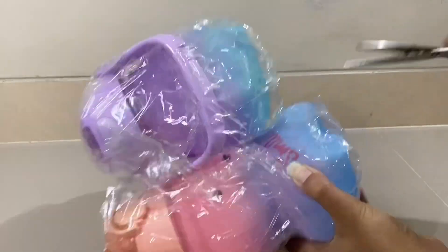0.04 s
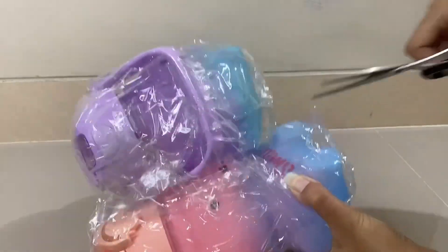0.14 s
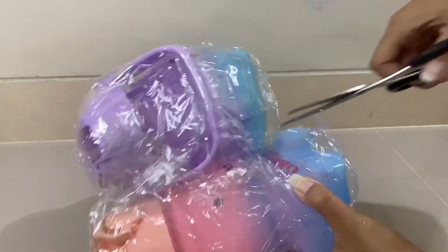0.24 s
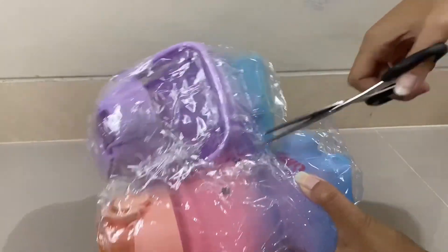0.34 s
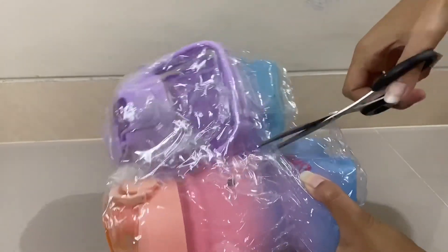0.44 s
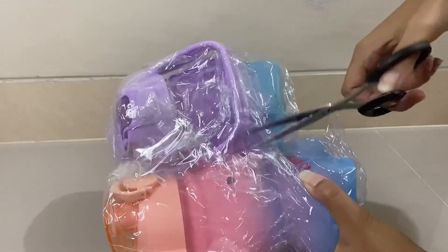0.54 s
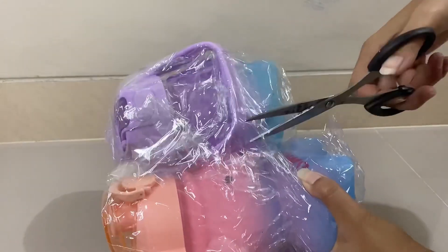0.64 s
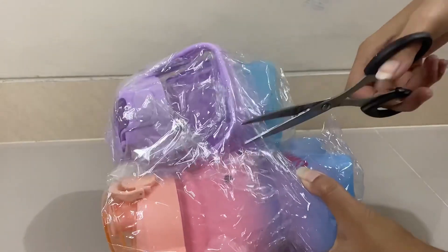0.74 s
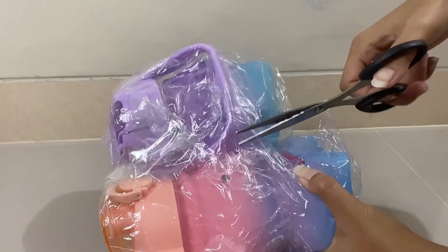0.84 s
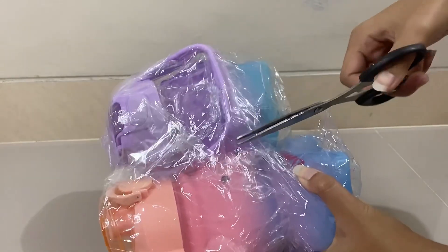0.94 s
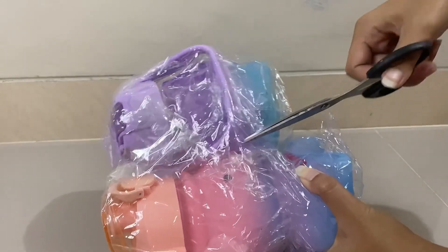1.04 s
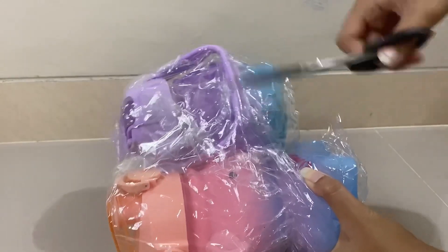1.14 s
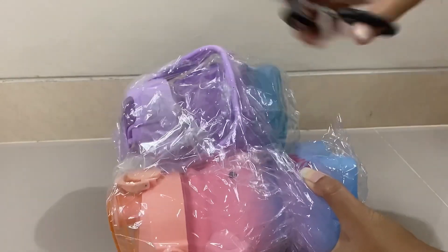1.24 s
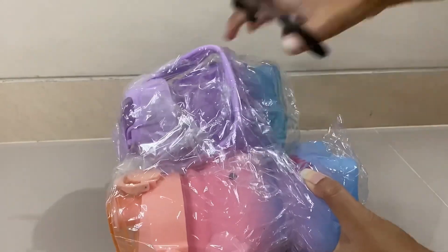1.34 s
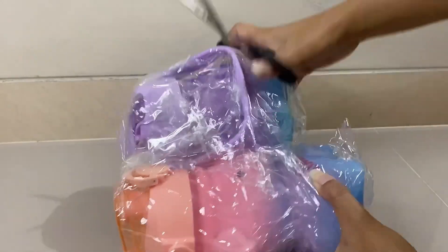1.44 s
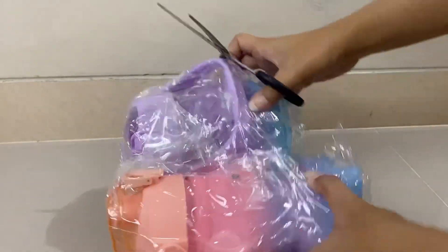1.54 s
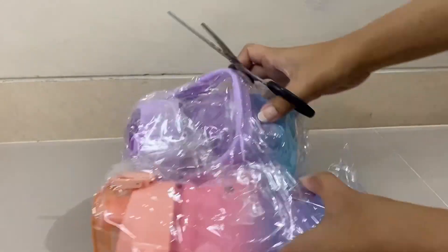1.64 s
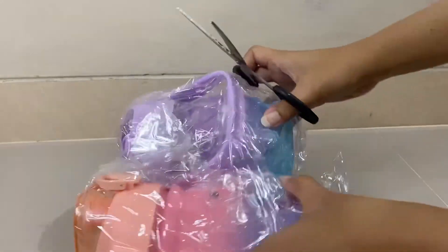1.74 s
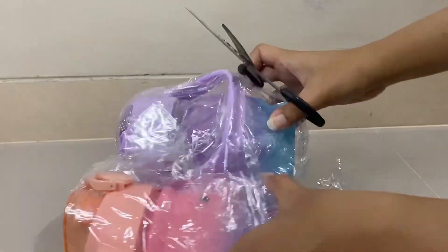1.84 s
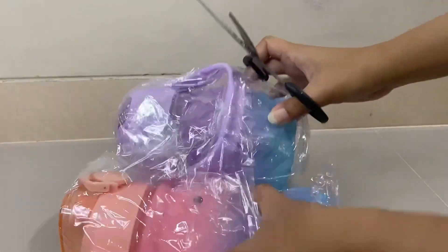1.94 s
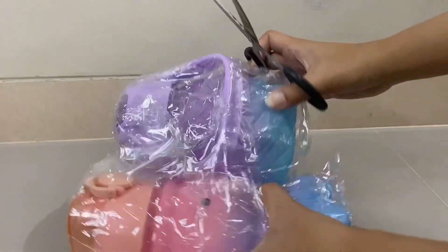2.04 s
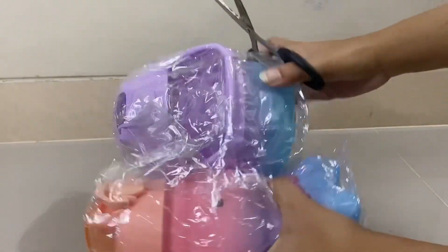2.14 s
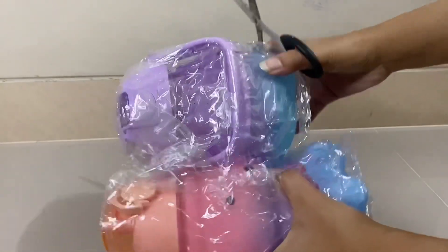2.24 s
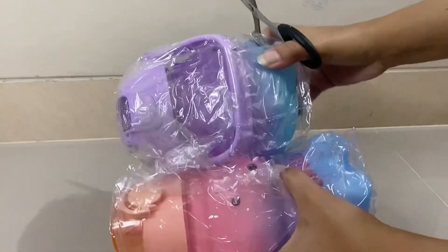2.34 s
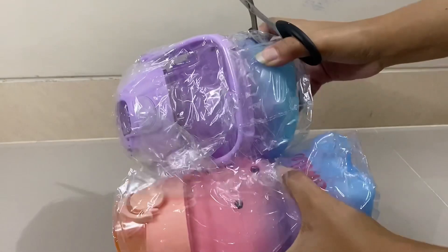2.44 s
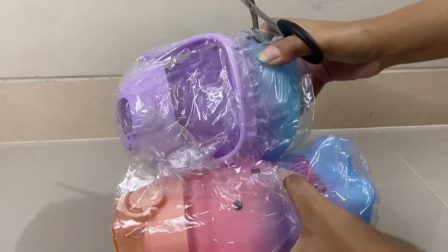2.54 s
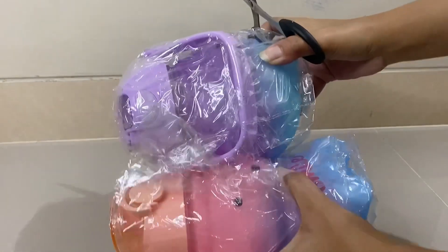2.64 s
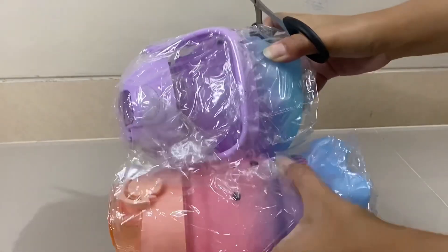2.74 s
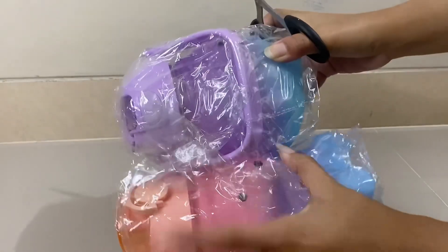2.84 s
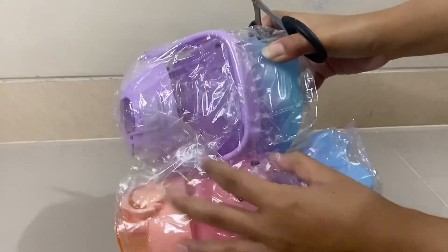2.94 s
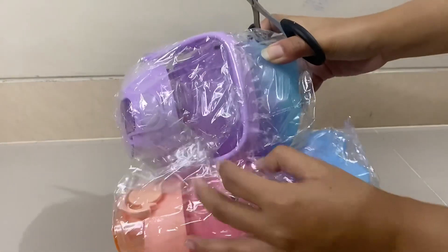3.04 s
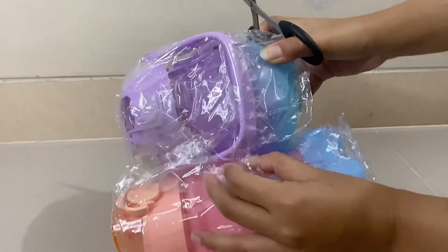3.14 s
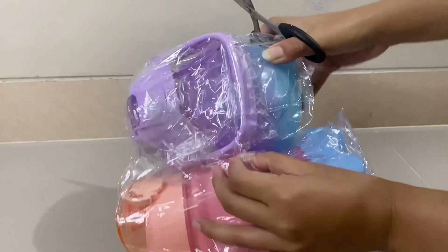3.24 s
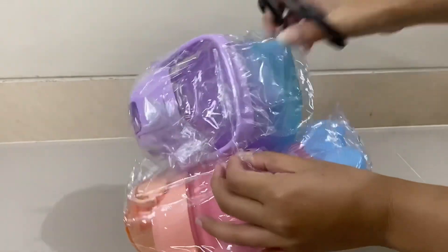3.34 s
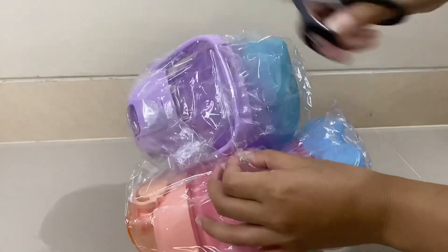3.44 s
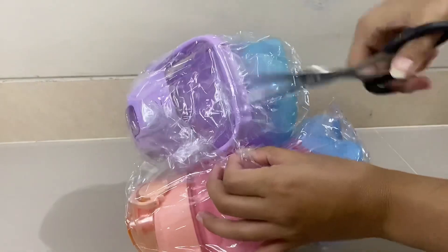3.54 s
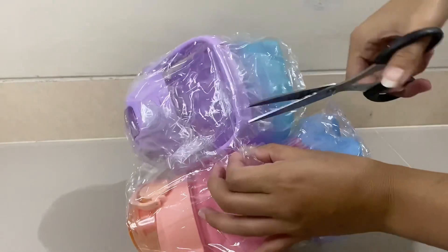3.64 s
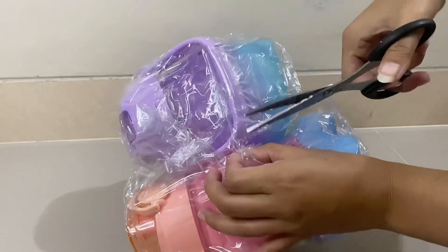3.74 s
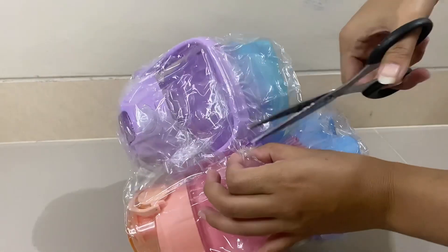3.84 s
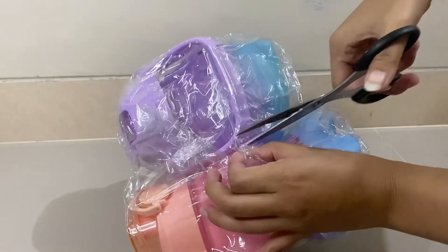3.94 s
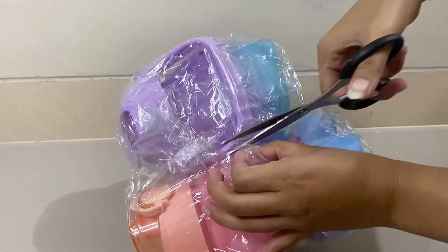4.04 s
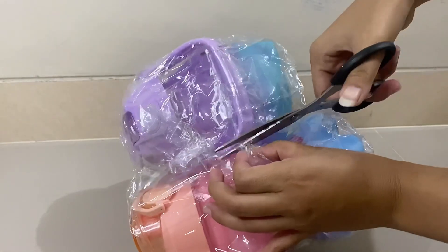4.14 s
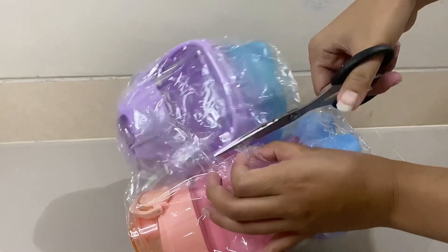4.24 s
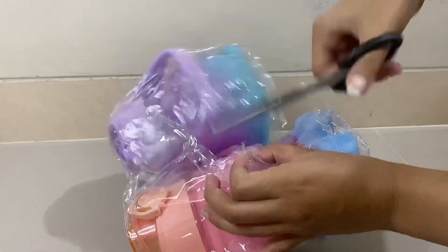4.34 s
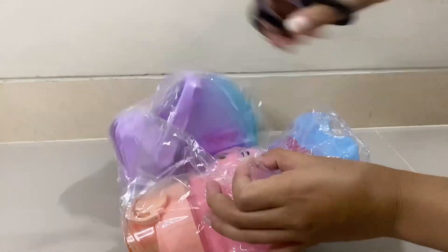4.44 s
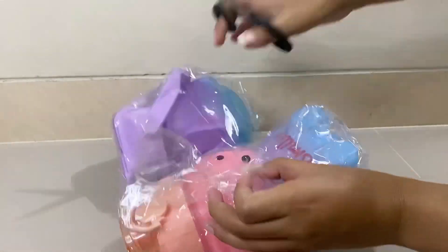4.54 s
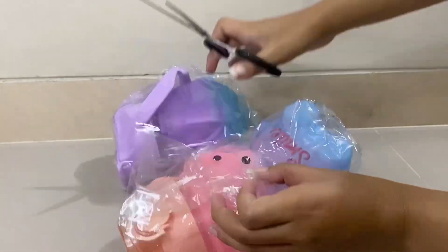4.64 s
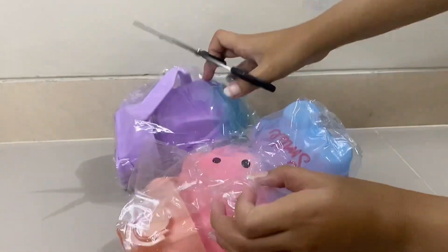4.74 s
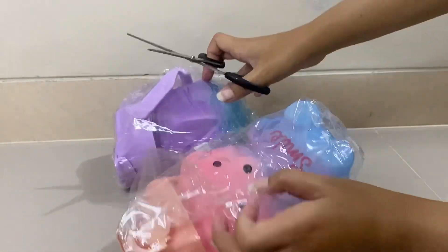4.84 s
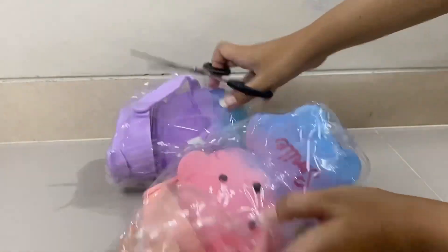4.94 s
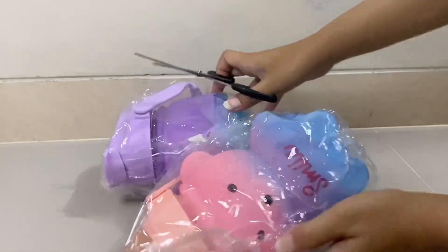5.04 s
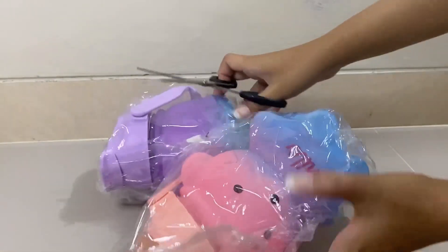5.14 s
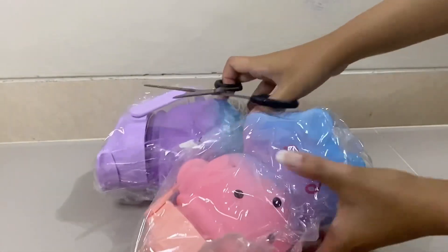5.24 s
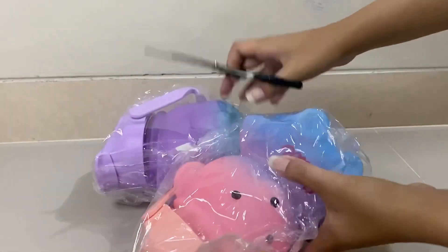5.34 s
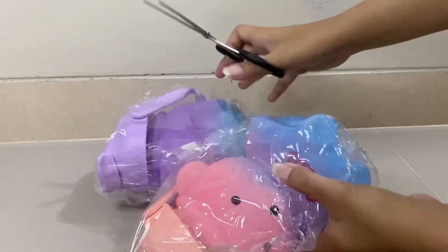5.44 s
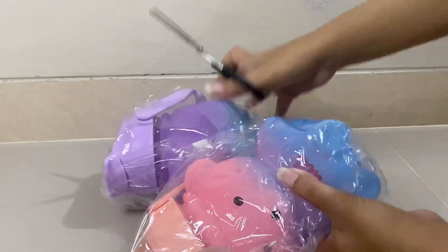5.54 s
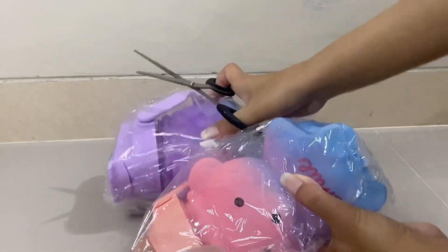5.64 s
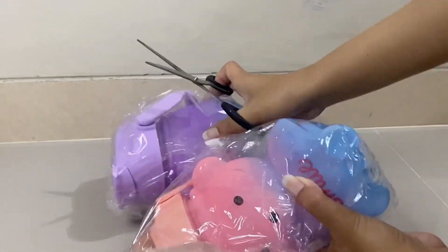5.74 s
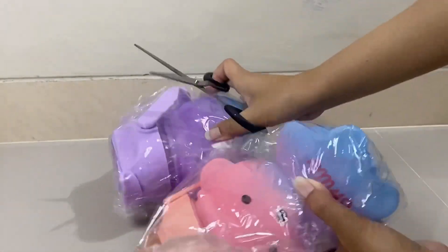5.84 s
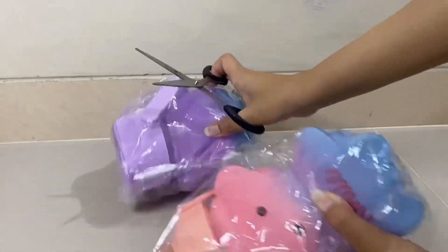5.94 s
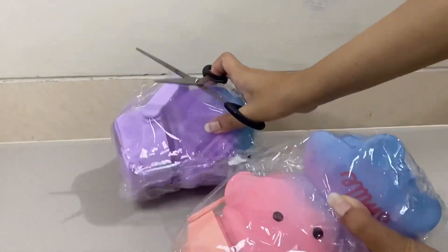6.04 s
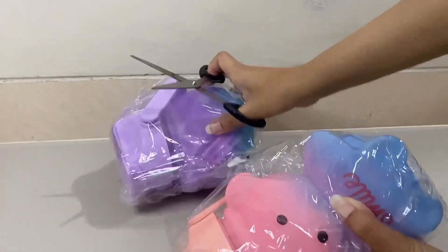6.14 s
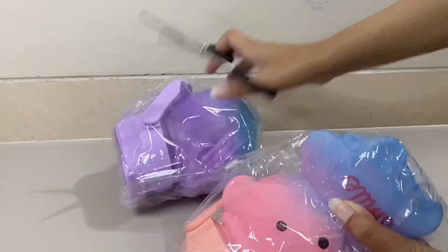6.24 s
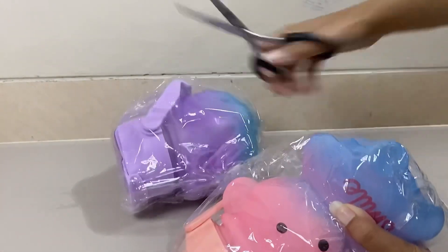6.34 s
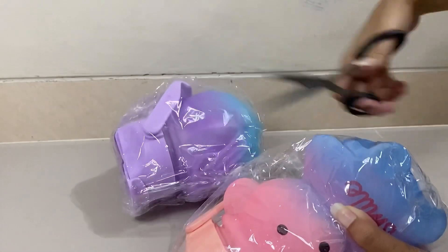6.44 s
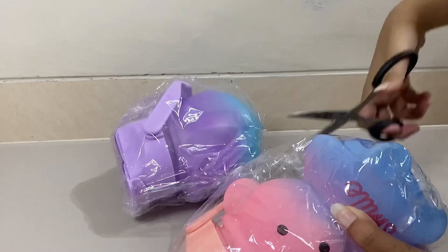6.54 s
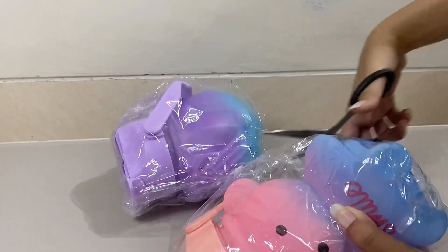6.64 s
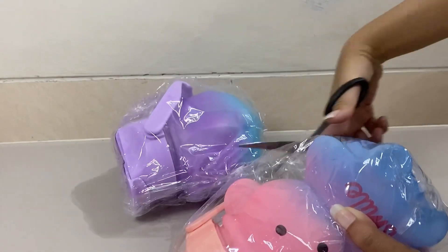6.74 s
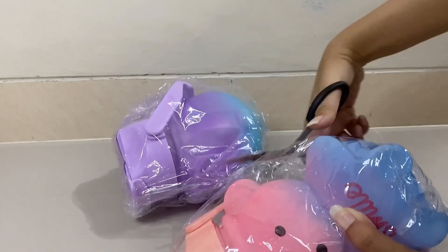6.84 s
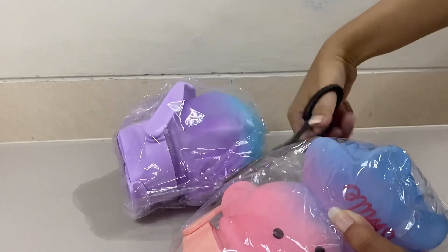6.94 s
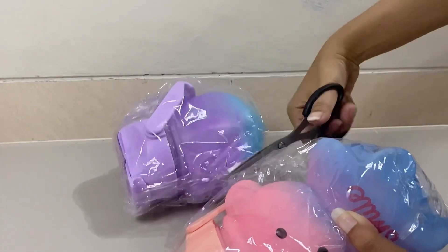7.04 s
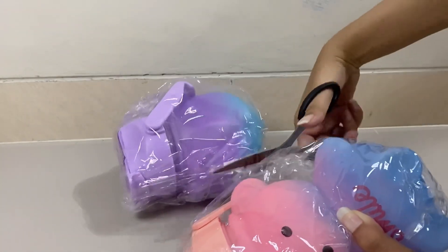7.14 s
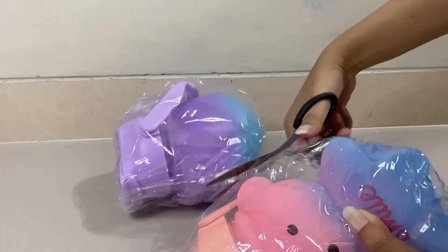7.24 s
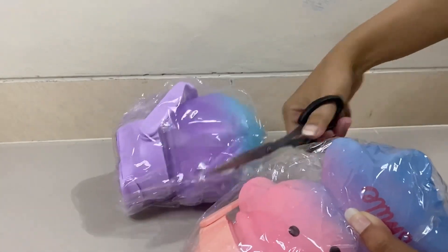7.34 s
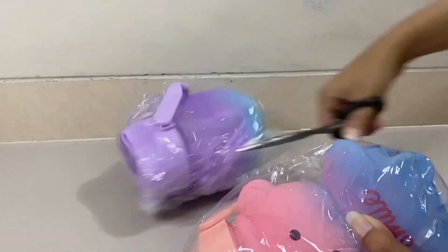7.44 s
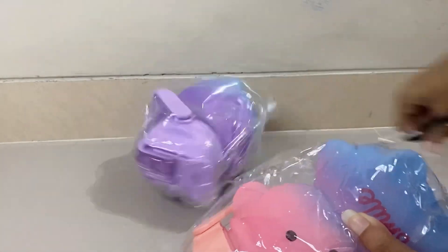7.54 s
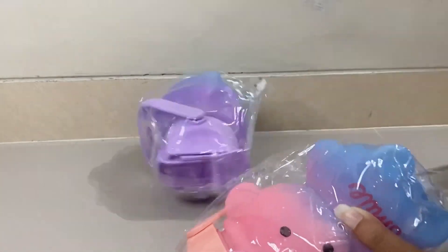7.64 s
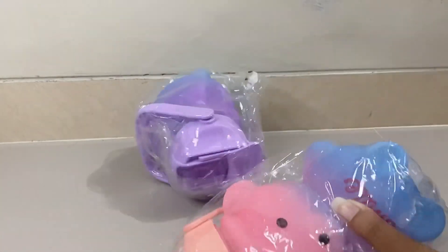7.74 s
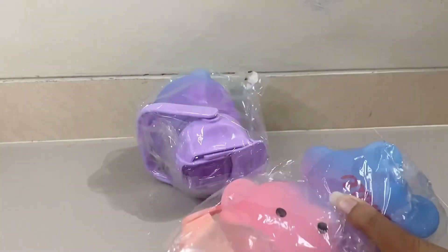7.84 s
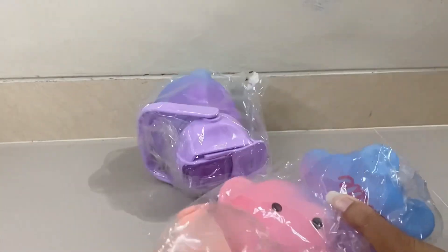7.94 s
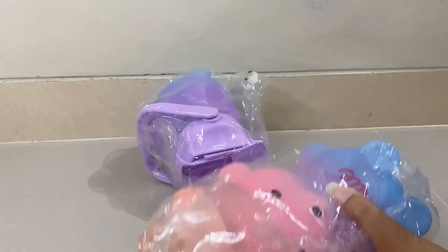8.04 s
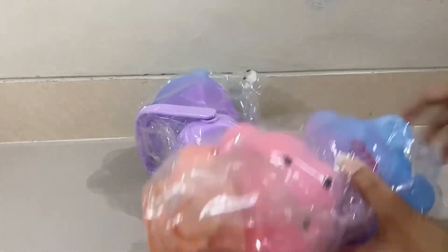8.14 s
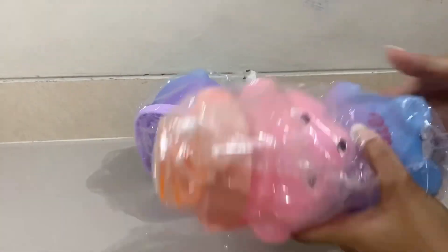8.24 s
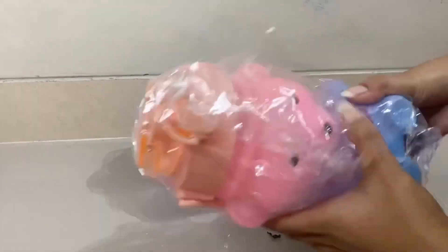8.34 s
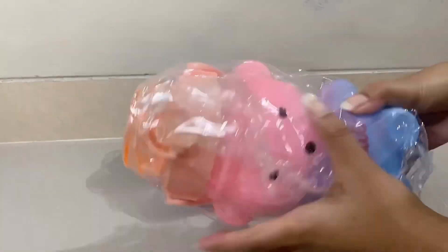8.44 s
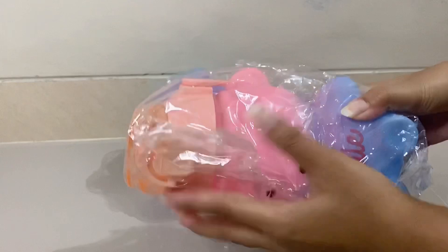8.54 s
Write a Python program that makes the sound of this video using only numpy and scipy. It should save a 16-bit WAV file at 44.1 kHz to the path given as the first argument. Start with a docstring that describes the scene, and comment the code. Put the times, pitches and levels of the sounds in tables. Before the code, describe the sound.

Close stereo pickup of hands working tight clear film around hollow plastic bottles in a small hard room. Bright crinkles and sharp snaps come in surges, denser after the first second. A loud hollow knock lands midway, another clattering bump follows later, then lighter crackling thins almost to quiet before a last burst. A faint low hum lies beneath.

```python
"""Hands and scissors work a tight plastic film off hollow plastic bottles on a counter in a small hard room.
A low building hum, noise in narrow resonances over faint air, lies below throughout and slowly weakens.
From the start the film's creases buckle: surges of noise bursts, clicks and brief rings, with louder snaps.
From about 1 s bottles knock, rattling noise into ringing modes, hardest near 4.4 s and again near 5.9 s;
then the handling is mostly lighter, with new surges to the end. Two microphone ports hear it at different moments."""
import sys
import numpy as np
from scipy import signal
from scipy.fft import rfft, irfft, next_fast_len
from scipy.io import wavfile

SR = 44100
rng = np.random.default_rng(int(sys.argv[2]) if len(sys.argv) > 2 else 0)


def persist_wave(psi):
    """Save psi, clipped to +-1, as 16-bit WAV."""
    counts = np.round(np.clip(psi, -1, 1) * 32767).astype(np.int16)
    wavfile.write(sys.argv[1], SR, np.atleast_2d(counts).T)


N = 378378

# stereo tilt of film and bottles: f/Hz, left minus right level/dB
STEREO_TILT = [(60, 0.3), (130, -1), (250, -6.5), (550, -0.5), (1000, 1), (1650, 2), (4970, 2), (15000, -1)]
LEFT_RIGHT = np.array([[0.5], [-0.5]])  # half of a tilt goes to each side
MEAN_HANDLING_DB = -45  # crackle level at which density and sheen are neutral


def from_db(db):
    """Decibels to gain; twice the decibels give a power gain."""
    return 10 ** (np.asarray(db) / 20)


def rms_one(x):
    """Scale to rms 1."""
    return x / np.sqrt(np.mean(x ** 2) + 1e-20)


def at_hz(points, hz):
    """Read a (f/Hz, value) table on a log-frequency axis."""
    table_hz, values = np.transpose(points)
    return np.interp(np.log(hz), np.log(table_hz), values)


def fade(power, t60):
    """Each power impulse dies away by 60 dB in t60 seconds; the summed energy is kept."""
    r = 10 ** (-6 / (t60 * SR))
    return signal.lfilter([1 - r], [1, -r], power + 1e-18)


def drift(rate_hz):
    """Slow chance of spread 1: noise through two equal low-pass poles, drawn every 40 samples."""
    r = np.exp(-80 * np.pi * rate_hz / SR)
    slow = signal.lfilter([1], [1, -2 * r, r * r], rng.standard_normal(N // 40 + 2002))
    slow = slow[2000:]  # past the filter's start
    return np.interp(np.arange(N) / 40, np.arange(len(slow)), rms_one(slow - slow.mean()))


def pair(white, alike):
    """Left and right noise of a given likeness from two unrelated noises."""
    alike = np.clip(alike, 0, 1)
    middle = np.sqrt(1 + alike) * white[0]
    side = np.sqrt(1 - alike) * white[1] * [[1], [-1]]
    return (middle + side) / np.sqrt(2)


def ring(drive, hz, t60):
    """A two-pole resonator: a unit click sets a sine of height 1 ringing, down 60 dB after t60 seconds."""
    r, w = from_db(-60 / (t60 * SR)), 2 * np.pi * hz / SR
    return signal.lfilter([0, np.sin(w)], [1, -2 * r * np.cos(w), r * r], drive + 1e-18)


def room_tone():
    """Building hum as noise in narrow low resonances, over a broad faint air; both weaken together."""
    # low resonances of the hum: f/Hz, width/Hz, relative level/dB
    resonances = [(47, 3.7, 3.5), (74.2, 3.1, 3.5), (100.6, 7.2, 0.5), (127.3, 5.9, -2), (160.1, 6.4, -7.5),
                  (200, 6.9, -12.5), (295.1, 6.2, -6.5)]
    # spectrum of the air: f/Hz, relative level/dB per Hz
    air_colour = [(30, -18), (45, 1), (110, -3), (250, -10), (450, -26.5), (1000, -33.5), (3000, -61),
                  (7000, -72), (15000, -57)]
    # slow weakening: t/s, level/dB
    weakening = [(0, 2), (2.2, 1.5), (3.5, 1), (6, -1.5), (8.58, -1.5)]
    size = next_fast_len(N)
    hz = np.maximum(np.fft.rfftfreq(size, 1 / SR), 1)
    hum_power = 0
    for centre_hz, width_hz, level_db in resonances:
        hum_power = hum_power + from_db(2 * level_db) / (1 + (2 * (hz - centre_hz) / width_hz) ** 2) ** 2
    white = rng.standard_normal((2, 2, size))
    hum = irfft(rfft(pair(white[0], 0.99)) * np.sqrt(hum_power), size)[:, :N]
    air = irfft(rfft(pair(white[1], 0.91)) * from_db(at_hz(air_colour, hz)), size)[:, :N]
    swell_db = np.interp(np.arange(N) / SR, *np.transpose(weakening))
    return from_db(swell_db - 49.5) * rms_one(hum) + from_db(swell_db - 52.5) * rms_one(air)


def handling():
    """Crackle level and body share in dB through time: the surges of the moving hands add up in power."""
    # grips, tugs and shifts of the film: peak t/s, peak level/dB, rise/s, fall/s, body share of lows/dB
    moves = [(.068, -52, 0.2, 0.065, 9), (0.153, -45.5, 0.035, 0.1, 7.5), (.33, -43, 0.057, 0.23, 0.5),
             (.48, -46, 0.18, 0.26, -2), (.59, -41, 0.073, 0.065, 0.5), (.67, -49, 0.038, 0.1, 0),
             (.82, -56.5, 0.18, 0.09, -4), (0.971, -41, 0.098, 0.13, 0), (1.066, -52, 0.024, 0.048, 6),
             (1.18, -55, 0.056, 0.05, 12), (1.237, -56, 0.026, 0.026, 0), (1.328, -59, .015, 0.038, -4),
             (1.362, -47, 0.052, 0.06, 1), (1.39, -42, 0.044, 0.28, -7), (1.47, -40, 0.1, 0.21, 3),
             (1.549, -36, 0.13, 0.24, 2.5), (1.89, -37.5, 0.33, 0.56, -3.5), (2.12, -35, 0.45, 0.25, -1.5),
             (2.33, -42, 0.2015, 0.42, -8.5), (2.53, -40, 0.51, 0.29, 0.5), (2.67, -36, 0.07, 0.35, -1.5),
             (2.97, -34, 0.064, 0.32, -3.5), (3.18, -36.5, 0.28, 0.45, -2.5), (3.58, -43, 0.074, 0.14, -2),
             (3.7, -49, 0.095, 0.23, 1.5), (3.88, -48.5, 0.08, 0.17, 7), (4.03, -44, 0.19, 0.15, 0.5),
             (4.15, -38, 0.18, 0.027, -1.5), (4.214, -40, .02, 0.24, 3), (4.3, -37.5, 0.19, 0.17, 2.5),
             (4.387, -38, .012, 0.042, 0), (4.41, -35, 0.0328, 0.26, 15.5), (4.49, -36.5, 0.198, 0.29, 3),
             (4.68, -47, 0.18, 0.26, -2), (4.84, -39, 0.085, .4, -0.5), (4.98, -34.5, 0.29, 0.11, 1),
             (5.08, -38.5, 0.17, 0.15, -3), (5.284, -35, 0.048, 0.11, -5), (5.38, -47, .2, 0.36, -1),
             (5.59, -37, .15, 0.55, 1), (5.79, -39, 0.39, 0.32, -7.5), (5.89, -30, 0.0697, 0.19, 6),
             (5.961, -30.5, 0.1894, 0.0972, -1.5), (6.15, -40.5, 0.16, 0.34, -2.5),
             (6.409, -48, 0.42, 0.19, -2), (6.52, -61, 0.052, 0.096, 4), (6.629, -62, 0.029, 0.061, -2.5),
             (6.73, -61, 0.038, 0.063, 14), (6.775, -48.5, .015, 0.088, 5), (6.8, -49.5, 0.056, 0.14, 1),
             (6.89, -44, 0.1005, 0.16, 3.5), (6.971, -38, 0.15, 0.11, 1.5), (7.1, -51.5, 0.083, 0.25, -0.5),
             (7.29, -45.5, 0.14, 0.14, 0), (7.36, -45, 0.13, 0.064, 4), (7.48, -38, 0.13, 0.056, 0),
             (7.56, -52.5, 0.1, 0.3, 3), (7.691, -67, 0.069, 0.06, 2.5), (7.79, -55.5, 0.043, 0.19, 9.5),
             (7.921, -52.5, 0.043, 0.32, 8.5), (8.08, -86, 0.096, 0.31, 2.5),
             (8.31, -35, 0.093, 0.25, -2.5), (8.56, -39.5, 0.26, 0.27, -1)]
    surge_span_db = 20  # what a surge climbs in its rise and loses in its fall
    t = np.arange(0, N + 64, 64) / SR
    power, body = from_db(2 * -70), 0  # the film settling between moves
    for s, peak_db, rise_s, fall_s, body_db in moves:
        away = np.maximum((s - t) / rise_s, (t - s) / fall_s)
        surge = from_db(2 * (peak_db - surge_span_db * away))
        power = power + surge
        body = body + surge * body_db
    return [np.interp(np.arange(N) / SR, t, curve) for curve in (10 * np.log10(power), body / power)]


def creases(handling_db):
    """Moments and energies of small random creases; harder handling buckles more a second, in clumps."""
    per_s = 330.0 * from_db(0.4 * (handling_db - MEAN_HANDLING_DB) + 4.0 * drift(25))
    at = np.flatnonzero(rng.random(N) < per_s / SR)
    size_db = 4.2 * np.minimum(rng.exponential(1, len(at)), 3.3)
    energy = from_db(2 * size_db)
    # divided by the rate, so that density alone does not change the level
    return at, energy / np.mean(energy) * SR / per_s[at]


def tinted(hz, level_db, body_db, treble_db):
    """Crackle level at one pitch: the body share rules the lows; harder handling brings more sheen."""
    low = np.interp(np.log(hz), np.log([1000, 2000]), [1, 0])
    high = np.interp(np.log(hz), np.log([5500, 11000]), [0, 1])
    sheen_db = 0.2261 * (level_db - MEAN_HANDLING_DB)
    return level_db + low * (3 + body_db) + high * (treble_db + sheen_db)


def buckling(at, energy, crease_db, snap_at, snap_db):
    """Half-octave bands of clicks, noise bursts and room tail; each crease or snap has its own colour."""
    # spectrum of the crackle: f/Hz, relative level/dB per Hz
    film_colour = [(150, -10.5), (350, -4), (550, -7), (900, -4.5), (1400, -2.5), (2000, 0.5), (2900, 1),
                   (4000, -2.5), (7000, -3), (10000, -6.5), (14500, -3)]
    # stereo likeness of the direct bursts: f/Hz, likeness (0 to 1)
    likeness = [(150, 0.41), (600, 0.11), (1700, 0.4), (4000, 0.099), (6500, 0.35), (9000, 1), (15000, 1)]
    # bands of the snap levels: f/Hz
    snap_bands = [170, 420, 900, 2000, 5000, 11000]
    snap_onset_s, snap_fall_s, rustle_t60_s = 0.0062, 0.0028, 0.019  # 60 dB times; the fall is longer in the lows
    room_t60_s = 0.17
    edges = np.append(130 * 2 ** np.arange(0, 6.9, 0.5), 16500)
    crease_colour = rng.standard_normal((len(at), len(edges)))
    snap_colour = rng.standard_normal((len(snap_at), len(edges)))
    white = rng.standard_normal((4, 2, N))  # neighbouring bands and the tail get unrelated noise
    sign = rng.choice([-1, 1], N)
    out = 0
    for k, (low, high) in enumerate(zip(edges, edges[1:])):
        hz = np.sqrt(low * high)
        level_db = crease_db(hz) + at_hz(film_colour, hz) + 2.97 * crease_colour[:, k] + 6.5
        crease = np.zeros(N)
        crease[at] = energy * from_db(2 * level_db)
        level_db = np.array([np.interp(np.log(hz), np.log(snap_bands), row) for row in snap_db])
        snap = np.zeros(N)
        snap[snap_at] = 0.0016 * SR * from_db(2 * (level_db + snap_colour[:, k]))

        # the sharp instant of buckling
        click = sign * (from_db(-1.5) * np.sqrt(crease) + from_db(-2) * np.sqrt(snap))

        # a snap is a short noise burst with a soft onset, then a weaker, quickly fading rustle
        snap = fade(snap[::-1], snap_onset_s)[::-1]
        snap_burst = from_db(2 * -3) * fade(snap, snap_fall_s + 4.1 / hz)
        snap_rustle = from_db(2 * -7.5) * fade(snap, rustle_t60_s)

        # a small crease is a softer-edged burst of a few milliseconds, longer in the lows
        swell_s = 0.0045 + 3.3 / hz
        crease = fade(fade(crease[::-1], 5.0 * swell_s)[::-1], swell_s)
        burst_power = from_db(2 * -1.75) * fade(crease, swell_s) + snap_burst + snap_rustle
        burst = np.sqrt(burst_power) * pair(white[k % 2], at_hz(likeness, hz))

        tail_power = fade(from_db(2 * -3.25) * crease + from_db(2 * -7) * snap, room_t60_s)
        tail = np.sqrt(tail_power) * pair(white[2 + k % 2], 0.77)

        band = signal.butter(2, [low, high], "band", fs=SR, output="sos")
        side = from_db(at_hz(STEREO_TILT, hz) * LEFT_RIGHT)
        out = out + side * signal.sosfilt(band, click + burst + tail)
    return out


def bottle_ringing(at, energy, crease_db):
    """The bottles ring under the crackling film: each small crease sets one of their resonances sounding at
    random."""
    # resonances of the bottles under the film: f/Hz, relative level/dB, t60/s
    bottle_tones = [(372, -5, 0.048), (740, -8, 0.019), (880, 0.5, 0.013), (930, -14.5, 0.025),
                    (1400, -4.5, 0.041), (1980, -6, 0.019), (1990, -2.5, 0.042), (2620, -2, 0.013),
                    (2800, 0.5, 0.036), (3048, 2, 0.023), (4460, -1, 0.02)]
    dealt = rng.integers(0, len(bottle_tones), len(at))
    out = np.zeros((2, N))
    for k, (hz, level_db, t60) in enumerate(bottle_tones):
        clicks = np.zeros(N)
        clicks[at] = (dealt == k) * np.sqrt(energy) * from_db(crease_db(hz) + level_db - 18.0)
        out += ring(clicks, hz, t60) * from_db(rng.normal(1, 0.57) * LEFT_RIGHT)
    return out


def snap_rings(snap_at, level_db, ring_hz):
    """Each snap rings its own patch of film: a brief sine with a soft onset."""
    out, t = np.zeros((2, N)), np.arange(SR // 30) / SR
    envelope = from_db(-6.0 - 60 * t / 0.013) * np.minimum(t / 0.0012, 1)
    for i, snap_level_db, hz in zip(snap_at - 50, level_db, ring_hz):  # starts 50 samples early
        note = from_db(snap_level_db) * envelope * np.sin(2 * np.pi * hz * t)
        out[:, i:i + len(t)] += note[:N - i]
    return out


def film():
    """Plastic film buckling in small random creases and louder set snaps, as noise, clicks and rings."""
    # single creases snapping: t/s, level/dB, body share up to 900 Hz/dB, bright share from 5 kHz/dB, ring f/Hz
    snaps = [(0.035, -23.5, -19, -30, 2160), (0.0497, -23, -22, -26, 2130), (0.058, -22.5, -21, -30, 2180),
             (0.065, -31, -18, -28, 2210), (0.1056, -27, -37, -7.5, 2740), (0.143, -20.5, -8, -12, 1350),
             (0.153, -36, -2, 5, 4100), (0.1781, -40, -8, 4, 1590), (0.2034, -24.5, -17, -8, 3120),
             (0.2338, -34, -14, -6, 3100), (0.2883, -42, -18, 3, 2670), (0.305, -26, -14, -7, 2017),
             (0.3265, -21, -21, -6.5, 2740), (0.3521, -18.5, -19.5, -11, 1950), (0.43, -31, -25, -8, 2520),
             (0.4542, -27, -2, -3.5, 1990), (0.477, -29, -15, -3, 2950), (0.5051, -25, -25, -19, 1970),
             (0.5552, -25.5, -12, -10, 2460), (0.5837, -20, -18, -19, 1990), (0.6019, -26, -26, -3.5, 1730),
             (0.668, -35.5, -17, 4.5, 2520), (0.6757, -45, -24, -4, 1430), (0.69, -36, -19, -14, 1400),
             (0.715, -38.5, -12, 2.5, 2780), (0.7267, -38, -22, -20, 1990),
             (0.7875, -36.5, -28, -1.5, 2800), (0.8405, -32, -36, -9, 3010), (0.851, -40, -27, -2, 2780),
             (0.8962, -30, -22, -5, 1940), (0.9112, -25, -18, -14, 2770), (0.9488, -26, -26, -24, 1870),
             (0.9782, -24, -20, -9, 1282), (0.9848, -20, -11, -12, 1450), (1.0578, -23, -13, -5.5, 1950),
             (1.068, -23, -19, -16, 4080), (1.126, -34, -24, -10, 1930), (1.1662, -36, -24, 2, 1970),
             (1.171, -34, -15, -2, 1910), (1.1847, -29.5, -4.5, -8, 1200), (1.2071, -28.5, -15, -9, 1383),
             (1.2418, -39.5, -6, -1.5, 2800), (1.3851, -20.5, -8, -3.5, 1570), (1.392, -21, -9, -4, 2880),
             (1.4032, -25, -14, -5, 1980), (1.432, -31.5, -17, 4, 2177), (1.459, -22.5, -3, -1.5, 1520),
             (1.501, -20, -8, -2, 1500), (1.514, -17, -17, -7, 2960), (1.5535, -17.5, -20, -7, 3093),
             (1.5884, -28.5, -1, 0, 1850), (1.6373, -22.5, -12, -4, 2760), (1.7038, -33, -19, -17, 3100),
             (1.7692, -24.5, -4.5, -5, 1436), (1.796, -30, -23, -8, 1950), (1.835, -36, -11, -1, 1412),
             (1.871, -24, -20, -6, 2800), (1.9172, -21.5, -6.5, -21, 2800), (1.948, -20.5, -19, -20, 2597),
             (2.1476, -31.5, -14, 7, 4490), (2.1742, -20.5, -6, -8, 2970), (2.2493, -32, -13, 1, 2470),
             (2.2987, -22.5, -24, -8, 2430), (2.3658, -22, -13, -13, 2470), (2.412, -22, -14, -1.5, 1650),
             (2.5946, -32, -14, -17, 2550), (2.6097, -46, -16, -4, 2950), (2.6549, -36, 0, 7, 1477),
             (2.7481, -23.5, -27.5, -17, 3005), (2.8272, -20.5, -16, -11, 4470),
             (2.858, -27.5, -5, -17, 3000), (2.889, -26, -13, -3.5, 2420), (2.9086, -31.5, -6, 6.5, 1917),
             (2.919, -26, -8.5, -1, 1980), (2.9468, -35, -12, 7, 4320), (2.9548, -18.5, -22, -3, 1850),
             (3.0301, -31, -19, 3, 1808), (3.0403, -25, -4, -3, 1280), (3.084, -25, -23, -27, 1746),
             (3.093, -24, -23, -27, 1875), (3.128, -27.5, -11, 1.5, 1915), (3.1524, -43, -8, -1, 2102),
             (3.18, -16.5, -15.5, -6, 1900), (3.2105, -37, -22, -9, 1840), (3.3228, -32, -16, 2, 4240),
             (3.3333, -29, -21, -3, 2817), (3.4562, -35.5, -4, 1, 1350), (3.522, -41, -23, 1.5, 2020),
             (3.5517, -30, -18, -5, 1390), (3.565, -38, -11, 3, 1970), (3.5791, -34.5, -3, 6.5, 1251),
             (3.601, -29, -19, -7, 1960), (3.61, -27, -25, -13, 1500), (3.6275, -24, -29, -10, 2020),
             (3.6594, -29.5, -23, -6, 2000), (3.6854, -20, -14, -4.5, 1975), (3.694, -35, -21, -4, 4400),
             (3.738, -26, -6, -7.5, 1390), (3.8195, -43, -18, 7, 4510), (3.8337, -20.5, -37, -8.5, 3000),
             (3.8607, -25.5, -12, -0.5, 1950), (3.874, -28.5, -17, -5, 3510), (3.9048, -40, -14, -1, 1917),
             (3.9232, -38, -19, 3.5, 2043), (3.9644, -33.5, -14, -1.5, 2110),
             (4.02, -27.5, -18, -4.5, 1856), (4.0332, -27, -18, -21, 1980), (4.0655, -29, -18, -27, 2080),
             (4.11, -35.5, -17, 7.5, 2120), (4.148, -22, -23, -15, 2145), (4.1545, -18, -23, -13, 1890),
             (4.2089, -11, -6.5, -2.5, 2048), (4.2511, -29.5, -14, 1, 2720), (4.2784, -17, -4.5, -9, 1452),
             (4.3155, -28.5, -14, 5.5, 3150), (4.33, -34, -17, 7, 1800), (4.398, -3.5, -8, -12, 2216),
             (4.4111, -9.5, -14, -19, 1650), (4.46, -12.5, 0, -14, 1345), (4.466, -13.5, -1.5, -3, 1230),
             (4.5291, -32, -6, 3, 3850), (4.6, -29, -15, -12, 1209), (4.6754, -29.5, -16, 3.5, 2505),
             (4.693, -44, 7, 9, 3726), (4.7323, -35, -13, 2, 2763), (4.7905, -27.5, -27, -9, 2947),
             (4.8491, -39, -12, 7, 2763), (4.8685, -36, -13, 9, 2756), (4.909, -31, -3, 2, 3010),
             (4.978, -11.5, -35, -14, 2953), (4.9989, -26, -14, -3, 2960), (5.0126, -23, -26, -21, 2423),
             (5.03, -30, -19, 3, 2520), (5.0859, -25, -9, -1.5, 2830), (5.1599, -37, -24, -4, 3130),
             (5.1818, -25, -16, -2.5, 3080), (5.2018, -27, -3.5, -2, 2204), (5.2438, -33.5, -16, -5, 3790),
             (5.2939, -26.5, -4, 1.5, 1704), (5.359, -19.5, -26, -8.5, 2915), (5.391, -37, -9, 4, 2740),
             (5.4408, -41, -3, 9, 2593), (5.4613, -38, -5, 5, 3140), (5.4719, -25.5, -30, -8, 2824),
             (5.496, -45, -6, 10, 3680), (5.515, -42, -13, 10, 2855), (5.552, -17, -11, -5, 3570),
             (5.6697, -28, -27, -12.5, 2830), (5.7252, -40, -23, 11, 3420), (5.7769, -30.5, 2, 2, 3060),
             (5.7992, -40, -16, 8, 2066), (5.8254, -20.5, -9, -17, 2640), (5.8546, -21.5, -16, 0, 2833),
             (5.896, -14, -7, -4.5, 3277), (5.9238, -7.5, -4.5, -17, 1230), (5.9765, -17.5, -3, -10, 2900),
             (5.995, -20, -18, -18, 2700), (6.0956, -42, -4, 2, 2660), (6.1095, -35.5, -14, 5.5, 3220),
             (6.1744, -22, -7.5, -9, 2530), (6.2272, -32, -5, 1, 2960), (6.2362, -27, -16, -13, 2906),
             (6.3065, -27, -24, -14, 2920), (6.3498, -34.5, 2, 1, 3060), (6.37, -35, -0.5, -2, 3440),
             (6.38, -30, -33, -5, 2910), (6.4154, -27, -35, -3, 2530), (6.4242, -31, -19, 2, 2690),
             (6.4397, -36, -16, 5.5, 2750), (6.458, -31.5, -15, -5, 2030), (6.6038, -32.5, -11, 0.5, 2597),
             (6.674, -48.5, -8, 1, 1220), (6.7933, -31, -11, -4, 3130), (6.7981, -22, -10, -1.5, 3790),
             (6.845, -30, -25, -5, 2800), (6.8785, -24, -6, -5.5, 2960), (6.897, -25, -3, -17, 3070),
             (6.97, -25, -18.5, -25, 2708), (7.0161, -25, -3.5, -9, 2997), (7.0306, -27, -16, -7.5, 2810),
             (7.0858, -35.5, -3, 0, 2530), (7.1022, -37, -2, 7, 4270), (7.147, -42, -22, 6, 2940),
             (7.1606, -49, -14, 5, 2580), (7.188, -29.5, -37, -2, 2845), (7.2404, -27, -20, -4, 2606),
             (7.377, -42.5, -2, -7, 2736), (7.4104, -41, -6.5, 10, 3500), (7.4777, -24, -28, -11, 2640),
             (7.484, -24.5, -10, -4, 3040), (7.54, -28.5, -14, -7, 2890), (7.577, -25, -10, -15, 3160),
             (7.677, -38, -23, -14, 3170), (7.6883, -39.5, -19, -1.5, 2674), (7.757, -33, -5.5, 3, 2800),
             (7.8, -36, -24, 1.5, 2080), (7.8577, -39.5, -15, 8, 4060), (7.8982, -49, 4, 13, 4390),
             (7.9064, -33, -9, 5.5, 3240), (7.9347, -43.5, -8, 13, 3890), (7.949, -41.5, -4, 7, 4440),
             (7.9733, -38, -12, -7, 2845), (8.0415, -43, -19, 3, 2210), (8.058, -35, -6, -15.5, 2220),
             (8.068, -17, -47, -8.5, 3200), (8.12, -36, -20, -2, 1950), (8.1488, -40, -13, 2.5, 4620),
             (8.1643, -31, -38, -10, 2880), (8.2442, -31.5, -4, 7, 2550), (8.3021, -22, -8, 1, 1850),
             (8.3653, -27, -29, -5, 2117), (8.383, -23, -24.5, -3, 3254), (8.3951, -30, -21, 1, 2108),
             (8.4798, -30, -19, 0, 2360), (8.511, -35, -11, 7, 2430), (8.5473, -37, -10, 9, 2860)]
    # colour of a typical snap, one value for each of its bands: level/dB
    typical_snap = [-22, 7.5, 13, 2.5, 3.5, 2.5]
    # treble of the crackle and snaps through time: t/s, level/dB
    treble = [(0, -6.5), (.3, -3.5), (1.3, -5), (1.5, -1), (4.2, -0.5), (4.45, -4.5), (4.7, 0.5),
              (6.0, -0.5), (7.3, -2), (7.75, 3), (8.2, -1.5), (8.58, 2.5)]
    handling_db, share_db = handling()
    at, energy = creases(handling_db)
    treble_db = np.interp(at / SR, *np.transpose(treble))

    def crease_db(hz):
        """Level of every small crease at one pitch."""
        return tinted(hz, handling_db[at], share_db[at], treble_db)

    snap_s, peak_db, body_db, bright_db, ring_hz = np.transpose(snaps)
    snap_at = (snap_s * SR).astype(int)
    shares_db = np.array([body_db, body_db, body_db, 0 * peak_db, bright_db, bright_db])
    snap_db = (peak_db + shares_db).T + typical_snap
    snap_db[:, -1] += np.interp(snap_s, *np.transpose(treble))
    ring_db = snap_db[:, 3] - 0.1736 * bright_db  # a duller snap rings more clearly
    noise = buckling(at, energy, crease_db, snap_at, snap_db)
    return noise + bottle_ringing(at, energy, crease_db) + snap_rings(snap_at, ring_db, ring_hz)


def bottles():
    """Each knock is a short rattle of contacts; it drives most the modes near the pitch of the spot struck."""
    # bottles against each other or the counter: t/s, level/dB, f struck most/Hz, rattle t60/s
    knocks = [(0.985, -31, 405, 0.058), (1.06, -31.5, 420, 0.061), (1.381, -24.5, 372.3, 0.052),
              (1.463, -19, 200, 0.039), (1.583, -24, 880, 0.019), (2.023, -27, 800, 0.012),
              (2.126, -30, 420, 0.022), (2.18, -34.5, 393, 0.017), (2.779, -21.5, 900, 0.016),
              (3.255, -31, 325.9, 0.025), (4.207, -19, 1189, 0.031), (4.399, -4, 215, 0.019),
              (4.401, -12.5, 1160, 0.017), (4.422, -15.5, 348, 0.074), (4.4, -7, 151, 0.68),
              (4.411, -12, 600, 0.018), (4.458, -19, 1170, 0.025), (4.459, -14, 287.5, 0.019),
              (4.51, -22, 332.5, 0.03), (4.478, -17, 326, 0.46), (5.2885, -18, 950, 0.015),
              (5.298, -23.5, 929, 0.16), (5.868, -12, 847, 0.13), (5.895, -8, 802, 0.58),
              (5.9232, -11.5, 1150, 0.0044), (5.924, -18, 342, 0.042), (5.983, -19.5, 873, 0.032),
              (6.771, -36.5, 756, 0.052), (6.896, -30, 889, 0.037), (6.95, -27, 906.5, 0.091),
              (7.907, -28, 380, 0.025), (7.92, -32, 380, 0.16), (7.952, -36, 388, 0.032)]
    # modes of the walls and the air inside: f/Hz, relative level/dB, longest t60/s
    modes = [(128, -10, 0.2), (159, -7.5, 0.21), (203, -6, 0.085), (256, -0.5, 0.14), (317, -3, 0.068),
             (369.8, 0, 0.2), (402, 13.5, 0.017), (600, 1, 0.0926), (724.7, 3, 0.05), (880, 3, 0.046),
             (967, -0.5, 0.078), (1252, 4.5, 0.041), (1580.6, -15, 0.033), (1950, 18, 0.14),
             (2190, 9, 0.057), (2530, 27.5, 0.1)]
    grip_damping = 2.27  # a held bottle rings at most this many rattle lengths
    out, t = np.zeros((2, N)), np.arange(SR // 3) / SR
    for s, peak_db, spot_hz, rattle_t60 in knocks:
        i = int(s * SR)
        noise = pair(rng.standard_normal((2, len(t))), 0.82)
        drive = noise * from_db(peak_db - 27.5 - 60 * t / rattle_t60) / np.sqrt(rattle_t60 / 0.029)
        # first solid contact, strongest in short rattles
        drive[:, 0] = from_db(peak_db - 6) / max(1, rattle_t60 / 0.034)
        for k, (hz, level_db, t60) in enumerate(modes):
            sense = (-1) ** k  # neighbouring modes move in opposite senses
            mode_db = level_db - 27.9 * abs(np.log2(hz / spot_hz))
            gain = sense * from_db(mode_db + at_hz(STEREO_TILT, hz) * LEFT_RIGHT)
            ringing = ring(drive, hz, min(t60, grip_damping * rattle_t60))
            out[:, i:i + len(t)] += gain * ringing[:, :N - i]
    return out


def scene():
    """Room tone, film and bottles together."""
    return room_tone() + film() + bottles()


def record(dry):
    """Sound reaches the left port a little earlier, its treble later; rumble and the top are cut."""
    side_lead_s, port_lag_s, port_from_hz = 0.00003, 0.00026, 5633
    size = next_fast_len(N + 64)
    hz = np.fft.rfftfreq(size, 1 / SR)
    lead_cycles = side_lead_s * np.minimum(hz, port_from_hz)
    lag_cycles = port_lag_s * np.maximum(hz - port_from_hz, 0)
    turn = np.exp(-2j * np.pi * (lag_cycles - lead_cycles))
    ports = np.array([irfft(rfft(dry[0], size) * turn, size)[:N], dry[1]])
    rumble_cut = signal.butter(8, 40, "high", fs=SR, output="sos")
    top_cut = signal.cheby2(14, 60, 16300, fs=SR, output="sos")
    return signal.sosfilt(top_cut, signal.sosfilt(rumble_cut, ports))


dry = scene()
out = record(dry)
persist_wave(out)
```